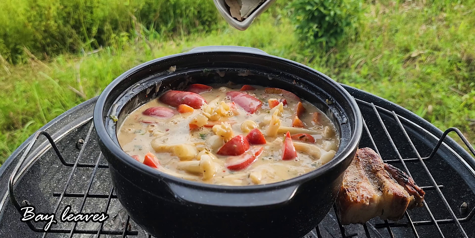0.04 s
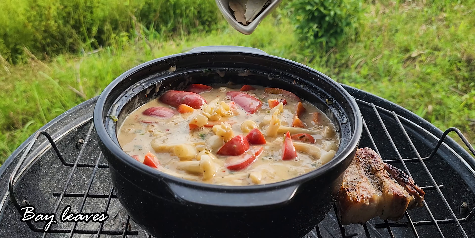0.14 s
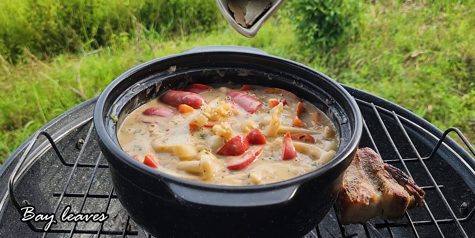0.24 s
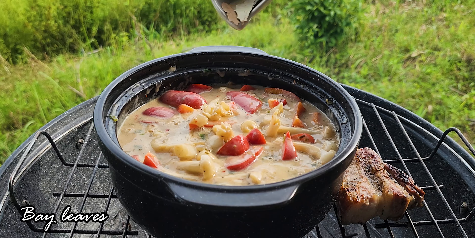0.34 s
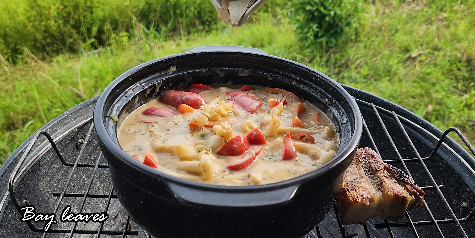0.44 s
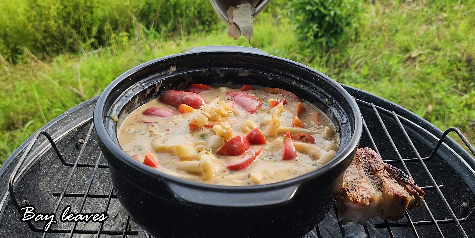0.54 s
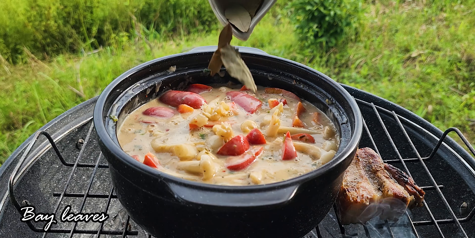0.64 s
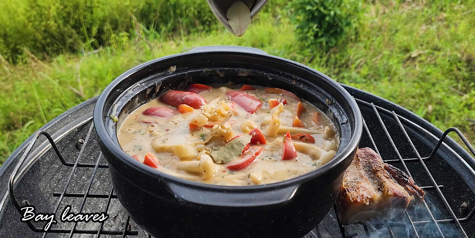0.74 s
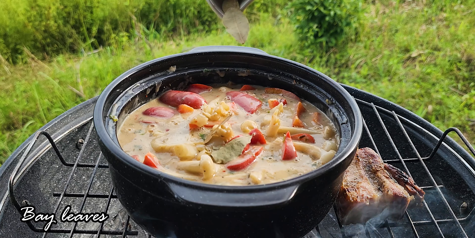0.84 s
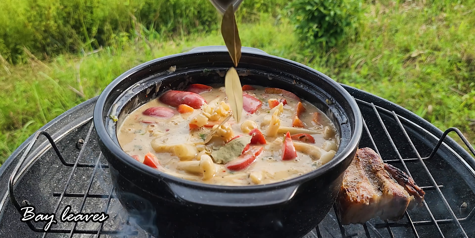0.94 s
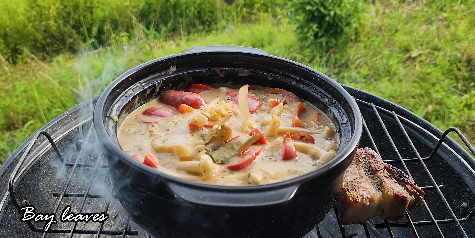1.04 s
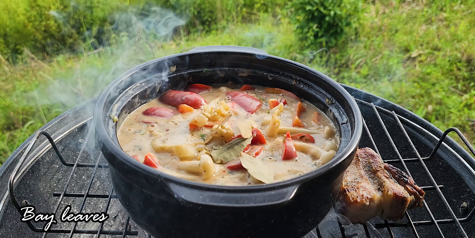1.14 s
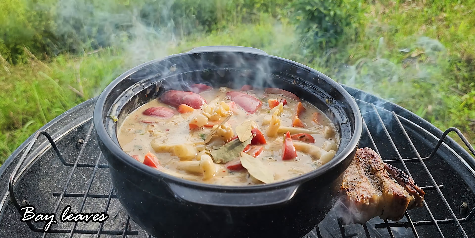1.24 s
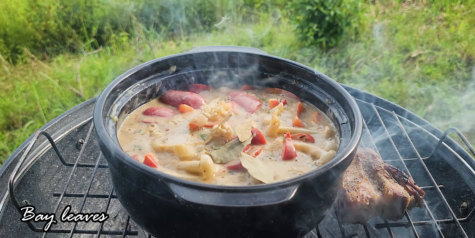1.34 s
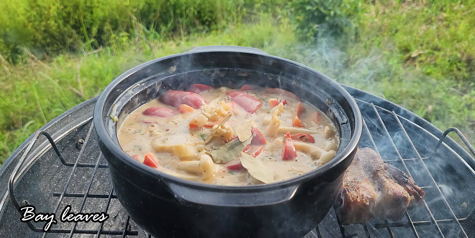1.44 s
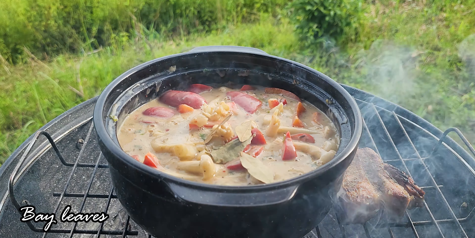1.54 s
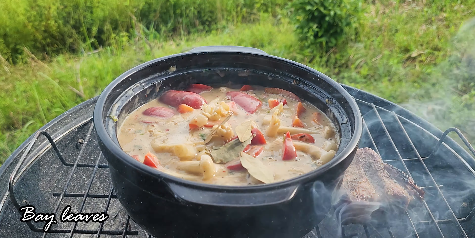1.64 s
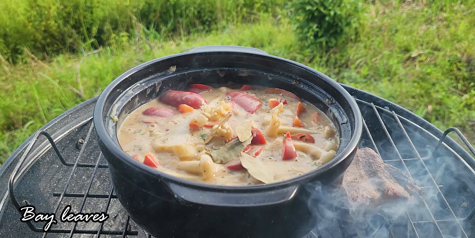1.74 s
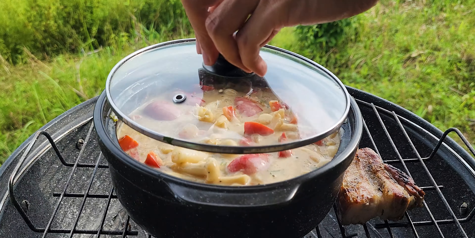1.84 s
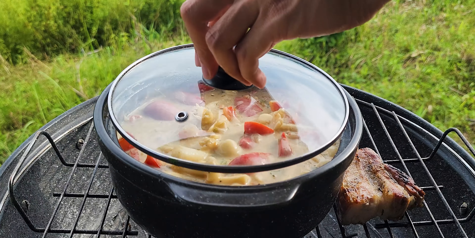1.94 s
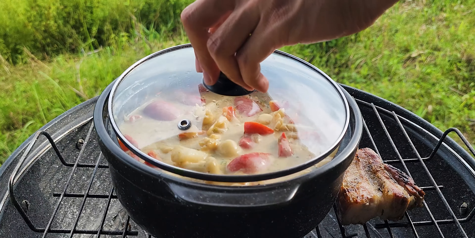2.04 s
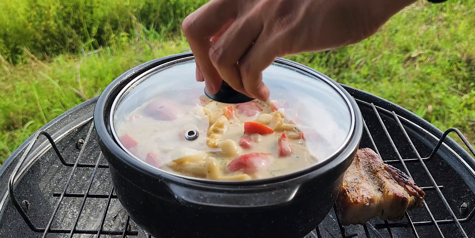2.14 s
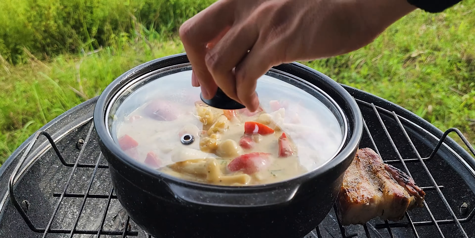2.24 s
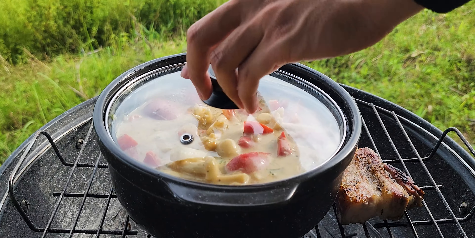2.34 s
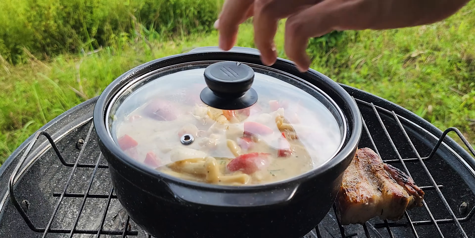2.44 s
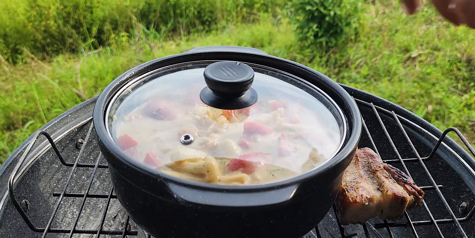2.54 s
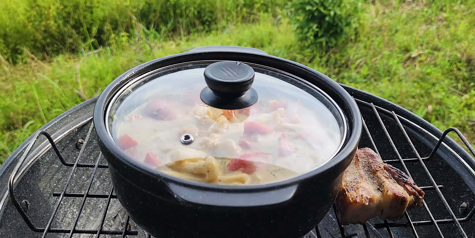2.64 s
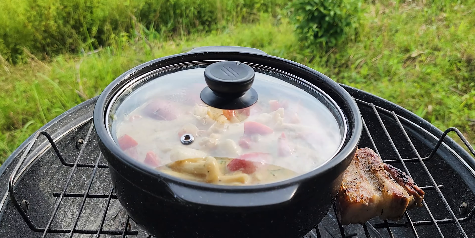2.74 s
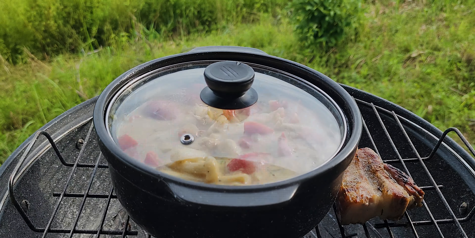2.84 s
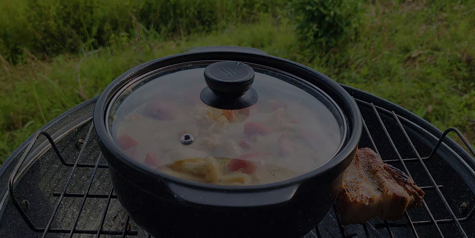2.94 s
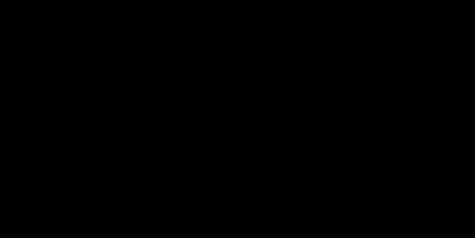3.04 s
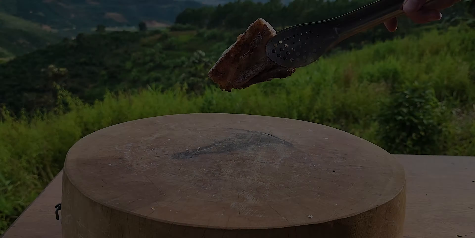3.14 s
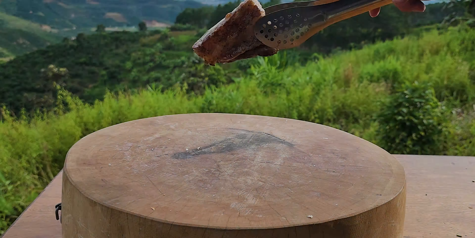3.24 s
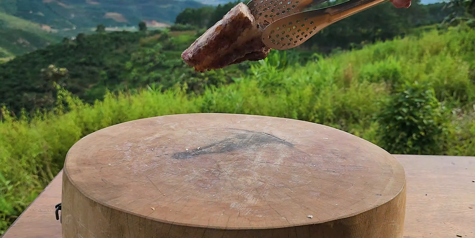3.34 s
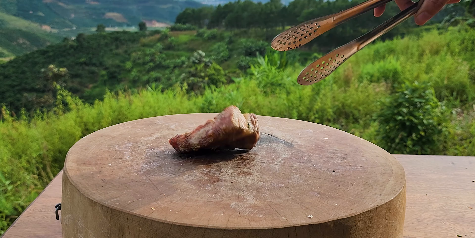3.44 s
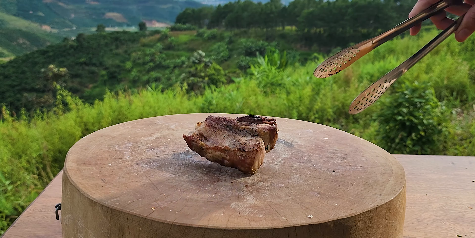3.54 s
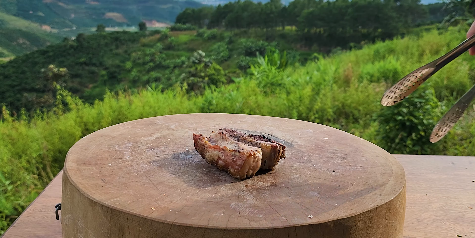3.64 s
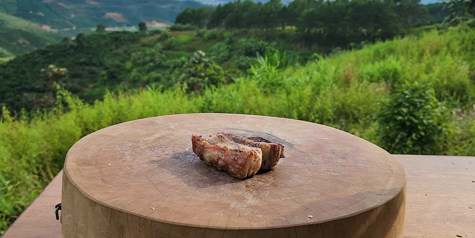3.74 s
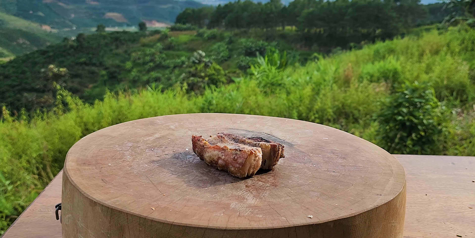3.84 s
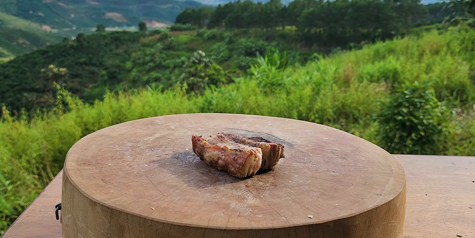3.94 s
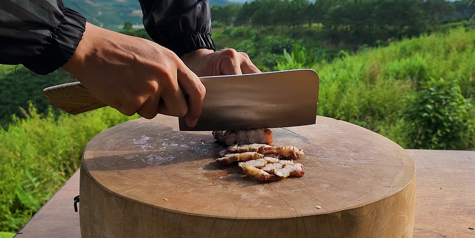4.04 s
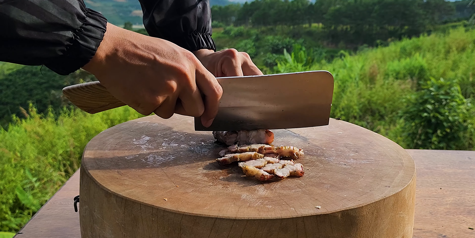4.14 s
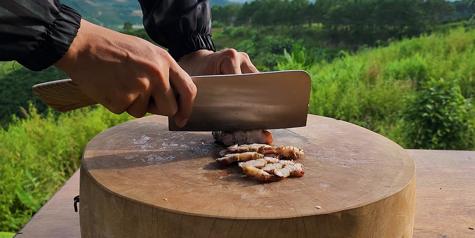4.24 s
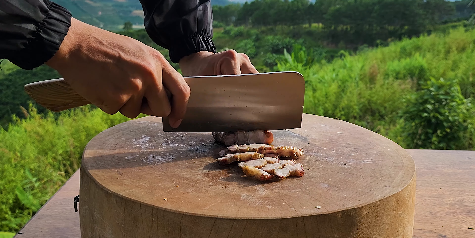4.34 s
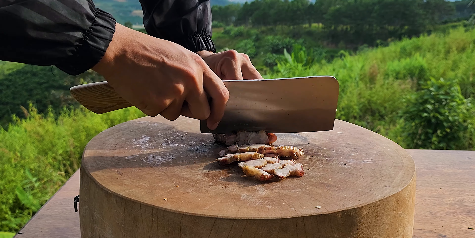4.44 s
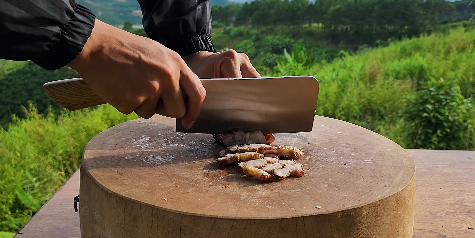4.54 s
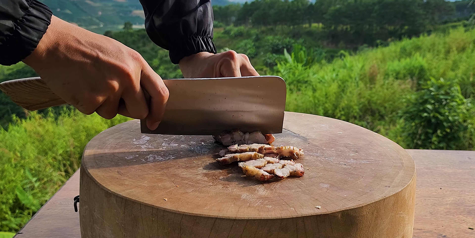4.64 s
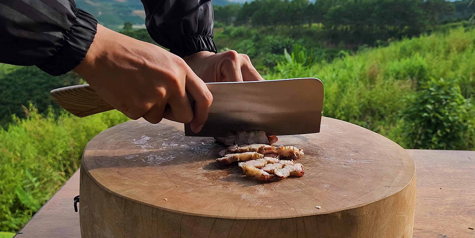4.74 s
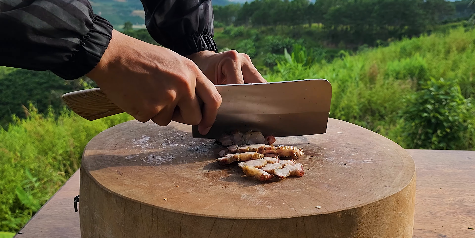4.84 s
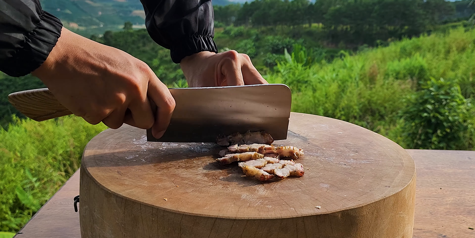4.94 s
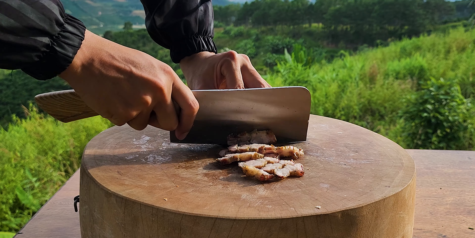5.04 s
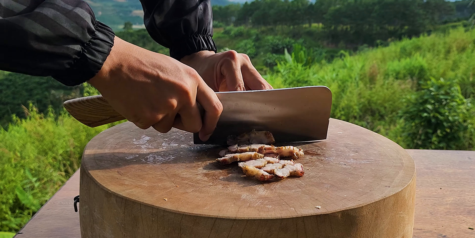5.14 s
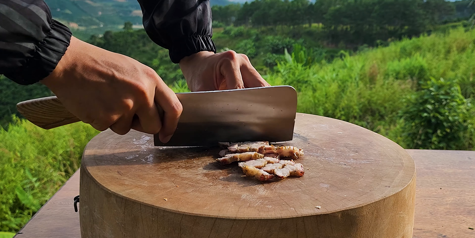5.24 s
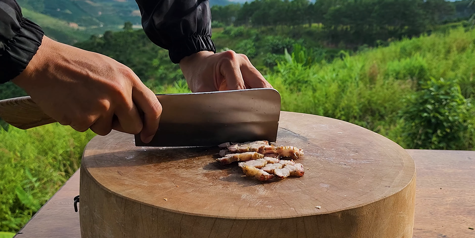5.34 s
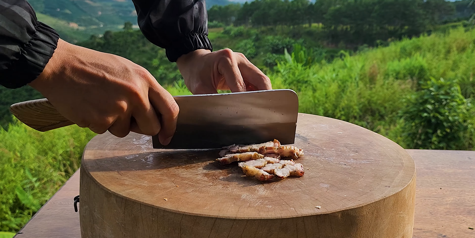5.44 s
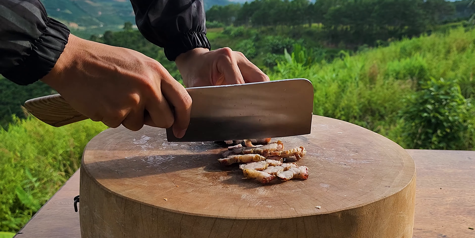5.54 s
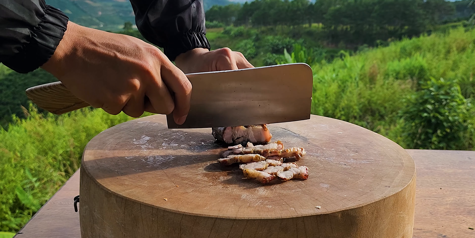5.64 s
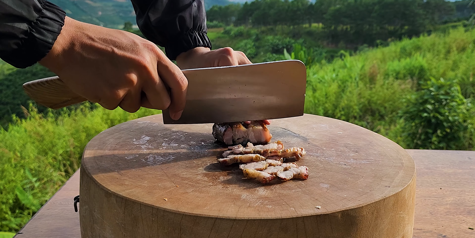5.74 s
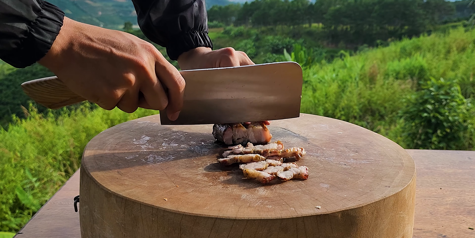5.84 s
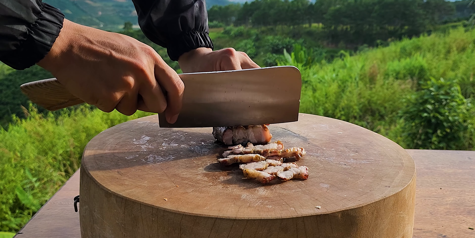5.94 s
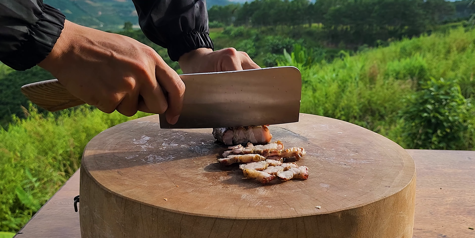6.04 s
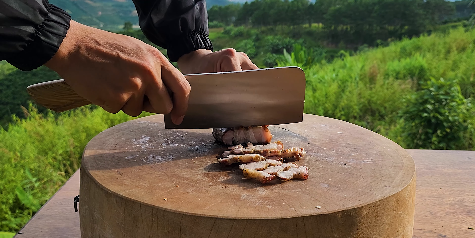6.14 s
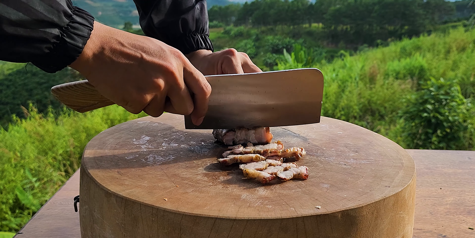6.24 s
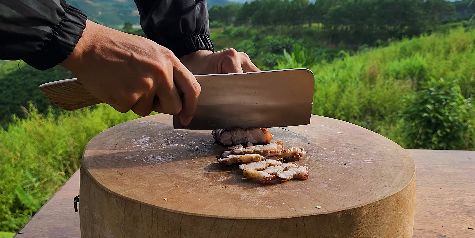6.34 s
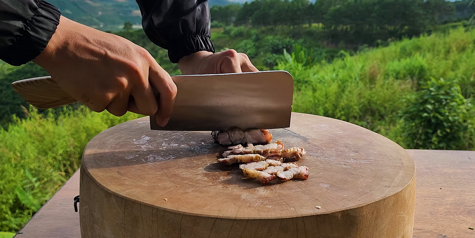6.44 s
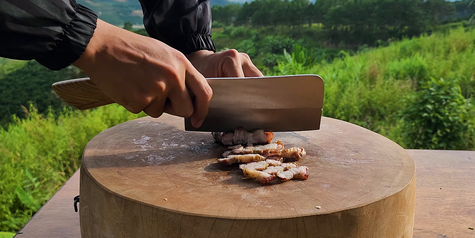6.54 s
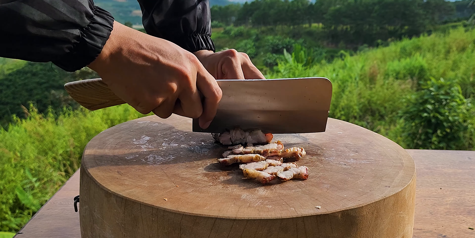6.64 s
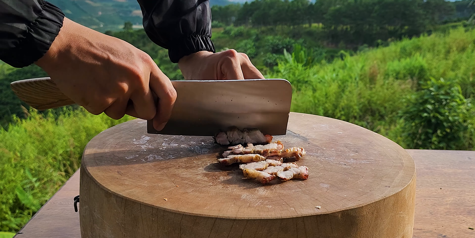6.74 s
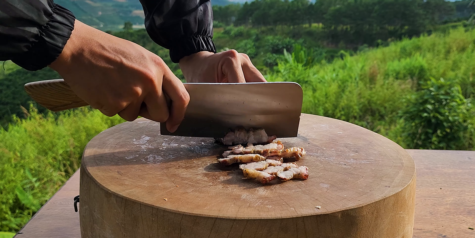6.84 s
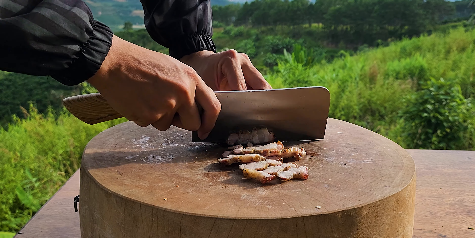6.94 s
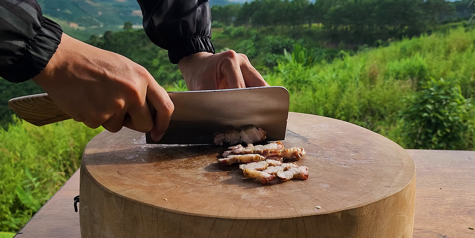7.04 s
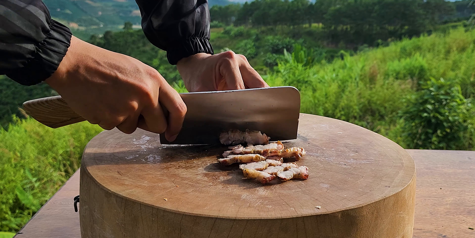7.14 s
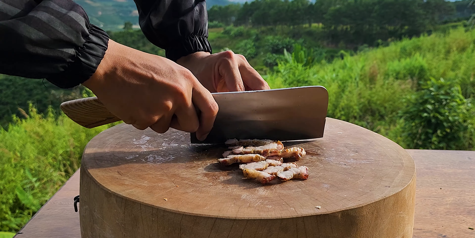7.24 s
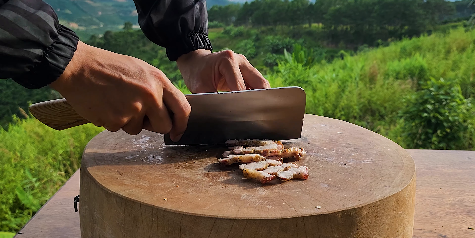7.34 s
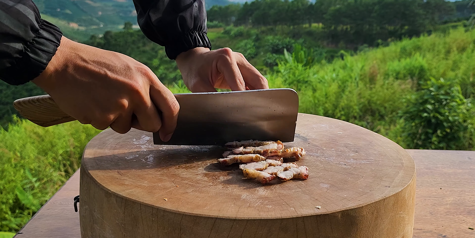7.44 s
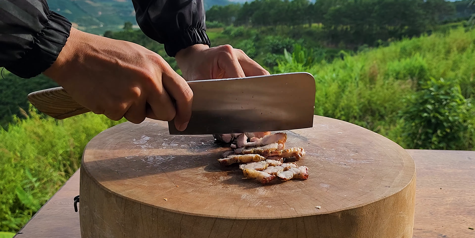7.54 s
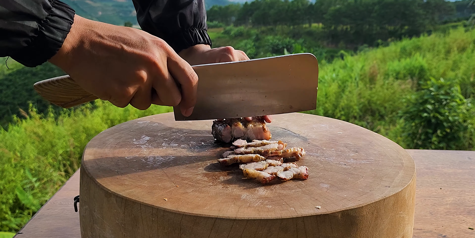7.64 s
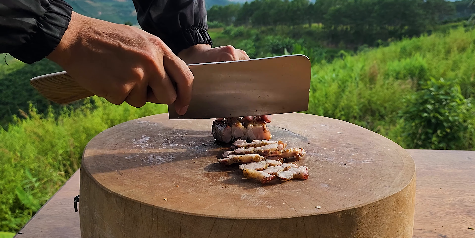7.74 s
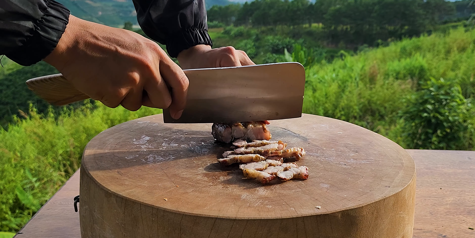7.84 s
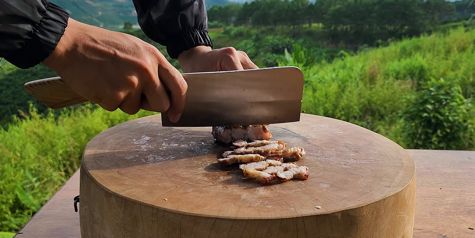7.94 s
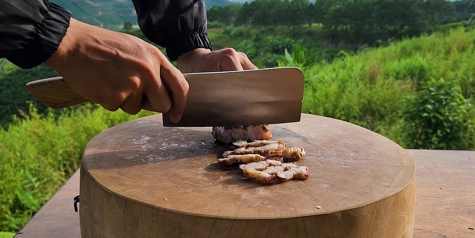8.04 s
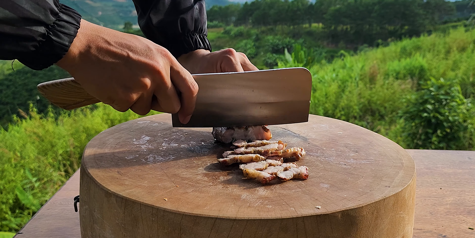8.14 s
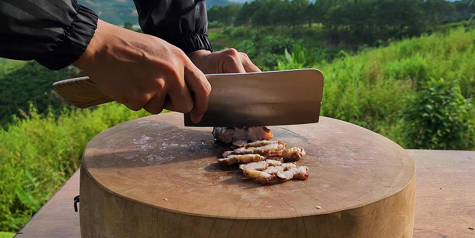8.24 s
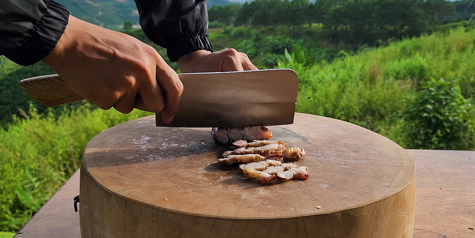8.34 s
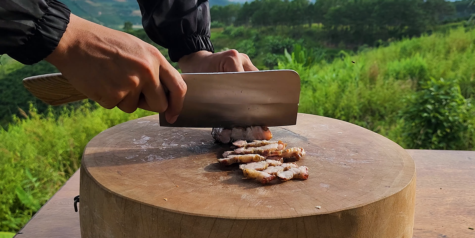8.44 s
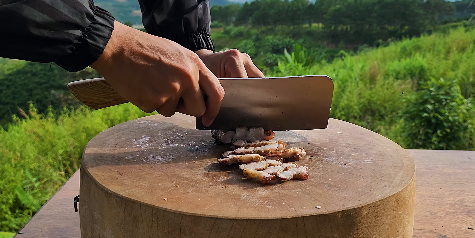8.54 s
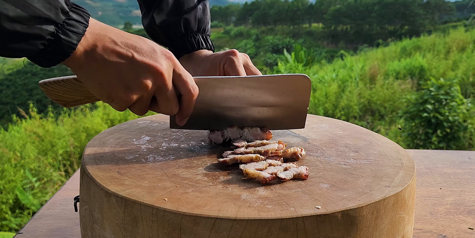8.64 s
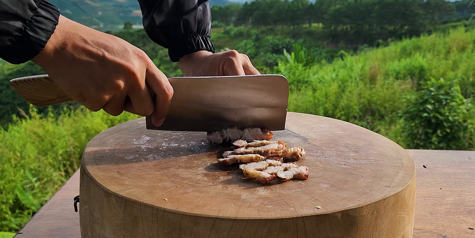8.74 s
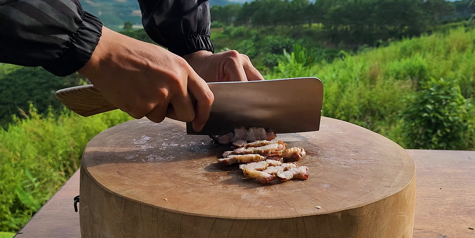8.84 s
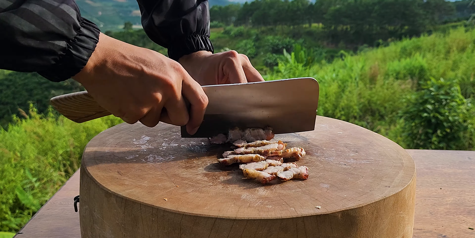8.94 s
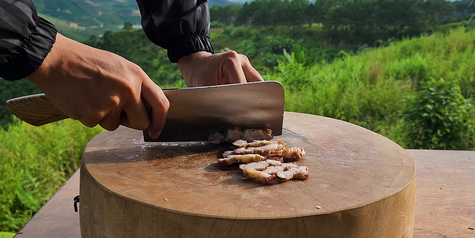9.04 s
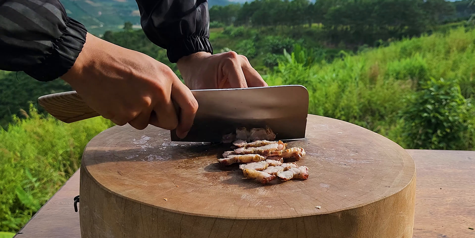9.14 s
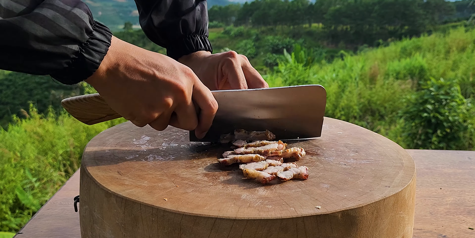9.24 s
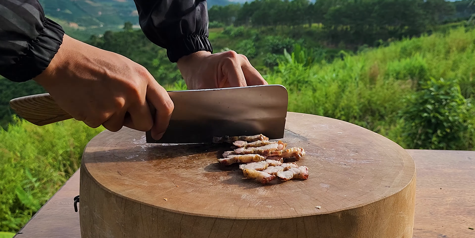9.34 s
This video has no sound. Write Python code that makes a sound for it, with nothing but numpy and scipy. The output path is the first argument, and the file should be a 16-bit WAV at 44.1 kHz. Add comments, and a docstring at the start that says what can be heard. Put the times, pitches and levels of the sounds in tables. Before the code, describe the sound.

Outdoors on a grassy hillside, close to a grill, food sizzles with small pops of fat. A glass lid lands on the pot with a loud, ringing clink. As the sizzling dies down, meat thuds onto a wooden block and a cleaver cuts it with quick sawing strokes and woody knocks. The sizzling returns, growing louder to the end. Insects shrill faintly, a bird repeats a falling whistle and soft gusts touch the microphone.

```python
"""Cooking on a hillside: a stew pot sizzles on a grill and a glass lid clinks down onto its rim.
Then meat drops on a thick wooden block and a cleaver saws through it and knocks the wood, until the sizzle swells again.
Birds whistle, insects shrill in the grass and the open air rumbles."""
import sys
import numpy as np
from scipy import signal
from scipy.fft import rfft, irfft, next_fast_len
from scipy.io import wavfile
from scipy.ndimage import uniform_filter1d

SR = 44100
rng = np.random.default_rng(int(sys.argv[2]) if len(sys.argv) > 2 else 0)


def generate_wav(signal):
    """Clip the signal to [-1, 1] and save it as 16-bit WAV at the path in sys.argv[1]."""
    frames = np.transpose(np.atleast_2d(signal))
    scaled = np.clip(frames, -1, 1) * 32767
    pcm = np.round(scaled).astype(np.int16)
    wavfile.write(sys.argv[1], SR, pcm)


N = 414099

# the sizzle swells, fades under the cutting and swells again: (s, sizzle dB)
HEAT = [(0, -60.5), (.4, -62), (1.1, -49.5), (1.7, -47), (2.25, -44.5), (2.95, -51.5), (3.6, -60), (3.8, -68), (4.3, -72.5), (7.3, -78), (7.65, -60.5), (8.1, -50.5), (8.5, -46.5), (9.05, -41.5), (9.39, -38.5)]
FRYING = [(120, -17.5), (200, -3), (316, -7.5), (547, -5.5), (719, -7), (863, -6), (1360, -8.5), (1550, -7), (2540, -5),
          (3590, -2), (4390, -1.5), (6220, -4.5), (6810, -5.5), (7740, -5), (15800, -23)]  # (Hz, dB per Hz)
# the loudest bursts of fat: (s, peak dB, pitch Hz)
SPITS = [(0.0662, -36, 7760), (0.4324, -36.5, 7300), (0.632, -30.5, 4830), (0.8712, -30.5, 5100), (1.2045, -27, 4450),
         (1.7903, -26.5, 3820), (1.8532, -22.5, 4610), (2.8324, -29.5, 4180), (2.8704, -35, 7200), (2.9782, -24.5, 4840),
         (3.1734, -33.5, 4200), (7.7806, -34, 3710), (8.4411, -24, 3070), (8.652, -28, 6050), (8.7515, -23, 4280),
         (9.028, -22.5, 5050), (9.0513, -18.5, 3660), (9.2833, -33, 6860)]
# lid on rim: (s, ring dB, clink dB)
LID = [(1.8891, -14.5, -9.5), (1.8913, -23, -12), (1.918, -14, -2.5), (1.932, -31, -13.5), (1.937, -26, -23.5), (1.963, -29, -26.5), (2.04, -35.5, -41), (2.1146, -51, -23)]
# lid and pot ringing together: (Hz, dB, t60 s)
POT = [(470, -15, .07), (517, -14, .1), (556, -5, .11), (615, 0, .12), (692, -16, .38), (726, -15, .1), (766, -12, .1), (1048, -14, .08), (1355, -13, .08), (1670, -11, .075), (2630, -19, .08), (3142, -4, .09), (3215, -10, .09)]  # fixed
RIM = [(1075, 89, -12), (1260, 180, -1), (1648, 23, -10.5), (2540, 71, -33), (3210, 196, 4.5), (4160, 110, -27),
       (4440, 300, -11), (5130, 180, -1.5), (5640, 74, -30), (5730, 110, -23), (6400, 240, 1), (7700, 78, -36),
       (8070, 130, -7), (9830, 110, -35), (10100, 160, -17), (11700, 66, -30), (13800, 150, -28)]  # the steel-edged lid: (Hz, width Hz, dB)
# dull knocks as the lid settles: (s, dB, t60 s)
SETTLE = [(2.203, -30.5, 0.1), (2.251, -30.5, 0.063), (2.262, -39.5, 0.31)]
SEAT = [(100, -6), (280, -9.5), (400, -3.5), (700, -7), (1400, -18.5), (2200, -14), (6000, -37.5)]  # (Hz, dB)
# meat or blade comes down on the block: (s, lead of the first wet touch s, thud dB, knock dB, wet smack dB)
BLOWS = [(3.499, 0.025, -31.5, -38, -36), (5.040, .006, -31, -22.5, -32), (6.886, .0155, -31, -22, -32), (7.424, .005, -37, -40.5, -40), (9.155, .033, -32, -27, -24.5)]
THUD = [(40, -1.5), (75, -16.5), (112, 14), (150, -10.5), (200, 3.5), (250, -18), (320, -11.5), (450, -25), (900, -34)]  # (Hz, dB)
KNOCK = [(180, -49), (300, 14), (364, -21), (463, 3), (618, -8.5), (809, -4.5), (1080, 1.5), (1200, -5), (1310, -2),
         (2020, -22.5), (2230, -12), (2500, -26), (3000, -62), (3900, -61), (6600, -120)]  # (Hz, dB per Hz)
FIBRES = [(400, -8), (1400, -6.5), (4500, -3), (6500, -1), (9000, -4.5), (12000, -11), (15800, -7)]  # (Hz, dB)
BLADE = [(810, 62, -1), (1215, 120, -18), (1380, 42, 7.5), (1627, 58, 3), (2010, 170, 1.5), (3364, 49, 5.5), (3950, 190, 2.5), (4910, 60, 4.5), (5530, 100, -4), (8370, 330, 1)]  # (Hz, width Hz, dB)
# the blade's edge catches and rings: (s, dB)
TINGS = [(5.385, -38.5), (6.69, -47), (7.4243, -29.5)]
# the cleaver's free modes: (Hz, dB, t60 s)
STEEL = [(650, -10, .07), (1367, -6, .11), (3222, -2, .17), (3838, -18, .2), (5265, -14, .11), (7880, -1, .1), (8050, -6, .07), (8800, -7, .06), (9650, -13, .06)]  # fixed
# a bird's long falling whistle: (s, dB, left-right dB)
WHISTLES = [(4.775, -61, -7), (5.335, -56.5, -7), (5.938, -55.5, -7), (6.529, -55, -6), (7.093, -53.5, -6)]
# its shape: (s from start, Hz, dB)
FALL = [(0, 3483, -10), (.018, 2780, -1), (.04, 2420, 2), (.08, 2130, 3), (.135, 2092, -10.5), (.17, 1970, 3), (.225, 1830, -14), (.27, 1738, -6), (.36, 1495, -14), (.42, 1440, -39)]
# a second bird's level pipe: (s, Hz, dB)
PIPES = [(3.995, 3520, -70), (4.077, 3450, -65), (5.913, 3275, -59), (7.984, 3500, -57.5)]
PIPE = [(0, .8, -4), (0.033, .91, 4), (0.064, 0.98, 8), (.12, 0.98, 9.5), (.15, .99, -48), (.2, 0.88, -28)]  # (s from start, share of pitch, dB)
# small birds' runs of downward chips: (first s, last s, spacing s, first Hz, last Hz, dB)
CHIPS = [(3.75, 4.017, .033, 9300, 8450, -61.5), (6.424, 6.614, .037, 5060, 5050, -60.5)]
SHRILL = [(5800, -46), (6500, -14), (6750, -20), (6950, 1), (7400, -4), (7600, 6), (7780, -13), (8200, -31)]  # insect chorus: (Hz, dB)
RUMBLE = [(12, -33), (20, 5), (38, -5.5), (81, -3), (118, -8), (135, -14), (195, -20), (242, -25), (269, -24),
          (500, -33), (650, -40), (1100, -120)]  # (Hz, dB per Hz)
HUSH = [(150, -5.5), (400, -2.5), (800, -6), (1500, -12.5), (3000, -16), (6000, -22), (9000, -20.5), (12500, -11), (14300, -5.5), (15500, -8.5)]  # steady faint hiss: (Hz, dB)
TOP_HZ = 15900  # fixed
# nearer crickets: (Hz, chirps a second, dB)
CRICKETS = [(7590, 11.5, -59), (7300, 13, -62), (7080, 9, -65), (6620, 8, -71)]  # fixed
# the block and the table under it: (Hz, dB, t60 s)
TABLE = [(203, 0, .16), (255, -7, .1), (325, -6, .08), (560, -9, .05), (1090, -3, .1), (1240, -7, .07)]  # fixed
# lesser bursts come at random: how many a second, their peak over the sizzle, their usual pitch
SPITS_PER_S, SPIT_OVER_DB, SPIT_HZ = 6, 13.5, 4300
# every blow bounces once: delay and loss; the meat is squeezed again as the blow lands
REBOUND_S, REBOUND_DB, SQUEEZE_DB = .0115, -5, -4.5
# light wet touches and cracks of the crust: (s, dB)
SMACKS = [(3.589, -39.5), (3.648, -45), (3.971, -45.5), (4.7, -40.5), (4.764, -33.5), (4.999, -37), (5.015, -34)]
# sawing off one slice: (middle of the first stroke s, tearing dB, its growth dB per stroke, blade rub dB)
SLICES = [(4.22, -53.5, 0.72, -57.5), (6.201, -56, 1.5, -60)]
# the cleaver goes to and fro evenly: time from stroke to stroke, length of one, extra rub once the edge is on the wood
STROKE_EVERY_S, STROKE_LENGTH_S, ON_WOOD_DB = 0.16674, 0.17, 11.5
# a run starts softly and grows by this much
CHIP_SWELL_DB = 9
# rumble of the air between gusts
AIR_DB = -48
# soft gusts: (middle s, half-length s, dB, left-right dB)
GUSTS = [(1.13, 0.057, -44, 4), (1.5, .4, -48, 4), (2.13, 0.078, -42, 2), (3.46, 0.28, -44.5, -1), (5.987, 0.4, -45, -5.5)]
# share by which the blade's resonances slide as the contact travels along the edge
BLADE_SLIDE = .035
# a bush cricket's very high rasp on the left: (s, dB)
RASP = [(3.1, -63), (4.3, -59), (9.39, -57.5)]
# its colour: (Hz, dB)
RASP_COLOUR = [(11000, -35), (13000, -18), (14000, -3.5), (15700, -8)]
# its wing strokes
RASP_HZ = 18.2
# gusts push on the microphone with a deeper rumble: (Hz, dB per Hz)
BUFFET = [(12, -22), (25, 2.5), (50, 0.5), (90, -7), (150, -23), (400, -50), (900, -120)]


def amp(db):
    """Decibels to gain."""
    return np.exp(np.asarray(db) * np.log(10) / 20)


def unit(x):
    """x at rms 1."""
    return x / np.sqrt(np.mean(x ** 2) + 1e-20)


def along(points, hz):
    """(Hz, value) points on a log axis."""
    f, v = np.transpose(points)
    return np.interp(np.log(hz + 1), np.log(f + 1), v)


def curve(rows):
    """(s, value) rows as one value per sample."""
    return np.interp(np.arange(N) / SR, *np.transpose(rows))


def wobble(rate):
    """A random curve through rate knots a second."""
    knots = rng.standard_normal(N // 40)
    return np.interp(np.arange(N) * rate / SR, np.arange(len(knots)), knots)


def filtered(x, response):
    """x times a complex response of frequency."""
    n = x.shape[-1]
    m = next_fast_len(n + 1024, real=True)
    return irfft(rfft(x.astype(np.float32), m) * response(np.fft.rfftfreq(m, 1 / SR)).astype(np.complex64), m)[..., :n]


def coloured(x, spectrum):
    """x with a (Hz, dB) colour, at rms 1."""
    return unit(filtered(x, lambda hz: amp(along(spectrum, hz))))


def pair(n, apart):
    """Stereo white noise; apart is the size of side against mid."""
    mid, side = rng.standard_normal((2, n))
    return unit(np.array([mid + apart * side, mid - apart * side]))


def placed(x, lead_ms, pan_db):
    """A source off centre reaches the left microphone earlier and louder."""
    sides = np.array([[.5], [-.5]])
    return amp(pan_db * sides) * filtered(x, lambda hz: np.exp(2j * np.pi * hz * sides * lead_ms / 10 ** 3))


def add(track, s, sound):
    """Mix a sound into the track at s seconds."""
    room = track[..., max(round(s * SR), 0):][..., :sound.shape[-1]]
    room += sound[..., :room.shape[-1]]


def burst(spectrum, t60, attack, apart, size=8000):
    """A dense cluster of vibrations that rises fast and dies away."""
    t = np.arange(size) / SR
    return coloured(pair(size, apart), spectrum) * amp(-60 * t / t60) * (1 - np.exp(-t / attack))


def ring(modes, spread, attack, size=10000):
    """Struck modes swell and fade; each radiates a little differently to the two sides."""
    t = np.arange(size) / SR
    sides = np.array([[1], [-1]])
    return sum((-1) ** k * amp(db + rng.normal() - 60 * t / t60) * np.cos(2 * np.pi * hz * t + spread * sides * rng.normal())
               for k, (hz, db, t60) in enumerate(modes)) * (1 - np.exp(-t / attack))


def outdoors(x, wet_db, t60):
    """Ground and bushes scatter a thin tail."""
    t = np.arange(SR // 2) / SR
    tail = rng.standard_normal((2, len(t))) * amp(-60 * t / t60) * (1 - np.exp(-t / 0.00607))
    return x + amp(wet_db) * signal.fftconvolve(x, tail / np.linalg.norm(tail[0]), axes=1)[:, :N]


def sizzle(rate=1500, size_db=4.5, grain_db=-3.5, fizz_db=-2.5, level_db=3.5):
    """Countless tiny steam bubbles burst; the larger ones stand out as crackle."""
    count = int(rate * N / SR)
    when, size, pitch, life = rng.random((count, 4)).T
    t = np.arange(96) / SR
    hz = 1300 * 9 ** pitch[:, None]
    strength = amp(size_db * np.minimum(-np.log(1 - size), 4))[:, None]  # fixed
    pops = strength * np.cos(2 * np.pi * hz * t) * np.exp(-t * hz / (.2 + life[:, None]))  # fixed
    grains = np.bincount(((when * N).astype(int)[:, None] + np.arange(len(t))).ravel(), pops.ravel())[:N]
    grains = coloured(grains, [(200, -0.5), (2000, -7.0), (6000, 1.0), (15000, 7.0)]) * amp(6.5 * wobble(110))  # bubbles burst in clusters
    mid = amp(grain_db) * coloured(grains, FRYING) + amp(fizz_db + wobble(35)) * coloured(rng.standard_normal(N), FRYING)
    side = amp(-46) * coloured(rng.standard_normal(N), FRYING)
    surge_db = 1.4 * wobble(18)  # fixed
    return amp(curve(HEAT) + level_db + surge_db) * np.array([mid + side, mid - side])


def spits(level_db=-4, t60=0.018, scatter_db=3, scatter_octaves=0.37):
    """Single bursts of hot fat, each with its own pitch; the lesser ones follow the heat."""
    out = np.zeros((2, N))
    lesser = []
    for s in rng.uniform(0, N / SR, int(SPITS_PER_S * N / SR)):
        db = np.interp(s, *np.transpose(HEAT)) + SPIT_OVER_DB + scatter_db * rng.normal()
        lesser.append((s, db, SPIT_HZ * 2 ** (scatter_octaves * rng.normal())))
    for s, db, hz in list(SPITS) + lesser:
        colour = [(300, -20), (hz / 3, -12), (hz / 1.7, -8), (hz, 0), (hz * 1.5, -10), (15000, -23)]
        add(out, s, amp(db + level_db) * burst(colour, t60, attack=0.00016, apart=0.033, size=1000))
    return out


def lid(pot_db=-2, rim_db=-9, crack_db=-6):
    """The lid lands on one edge, then the other, chatters and settles into its seat."""
    pot, edge = np.zeros((2, 2, N))
    rim = [(hz, db, 1.9 / width) for hz, width, db in RIM]  # a wider resonance dies sooner
    for s, ring_db, clink_db in LID:
        crack = burst([(300, -12.5), (600, 4), (1500, 2), (3200, 7.5), (5200, 0.0), (6500, -8), (8000, -12.5), (15000, -22.5)], t60=0.029, attack=.0001, apart=0.35, size=1500)
        add(pot, s, amp(ring_db + pot_db) * ring(POT, spread=0.11, attack=0.00033))
        add(edge, s, amp(clink_db + rim_db) * ring(rim, spread=0.8, attack=0.00013, size=2500))
        add(edge, s, amp(clink_db + crack_db) * crack)
    for s, db, t60 in SETTLE:
        add(pot, s, amp(db) * burst(SEAT, t60, attack=0.00059, apart=.2))
    return outdoors(placed(pot, lead_ms=0.1, pan_db=1.5) + placed(edge, lead_ms=0.17, pan_db=-0.5), wet_db=-22, t60=0.87)


def block(table_db=-4, touch_thud_db=-4):
    """A blow is a wet smack, then a woody knock and a thud that bounce once and ring the table below."""
    out = np.zeros((2, N))
    touches = list(SMACKS)
    for s, lead, thud_db, knock_db, smack_db in BLOWS:
        touches += [(s - lead, smack_db), (s, smack_db + SQUEEZE_DB)]
        for when, loss_db in [(s, 0), (s + REBOUND_S, REBOUND_DB)]:
            add(out, when, amp(thud_db + loss_db - 5.0) * burst(THUD, t60=0.25, attack=0.0041, apart=0.051))
            add(out, when, amp(knock_db + loss_db + table_db) * ring(TABLE, spread=.03, attack=0.0083))
            add(out, when, amp(knock_db + loss_db) * burst(KNOCK, t60=0.051, attack=0.0017, apart=0.11))
    for s, db in touches:
        add(out, s, amp(db) * burst([(600, 3.5), (1800, 2.5), (4200, 3.5), (6500, 3.5), (9000, 0.5), (15000, -1)], t60=0.056, attack=.0002, apart=0.92, size=2000))
        add(out, s, amp(db + touch_thud_db) * burst(THUD, t60=0.18, attack=0.0045, apart=0.037))
    return outdoors(placed(out, lead_ms=0.11, pan_db=0.5), wet_db=-11.5, t60=0.76)


def cleaver(grain_db=3.5, wood_db=-5):
    """Sawing tears fibres, rubs the blade into its sliding resonances and shakes the block; now and then the edge rings."""
    tear, rub = strokes()
    tings = np.zeros((2, N))
    clumps = 1.6 * wobble(70)  # fixed
    slips = amp(grain_db * wobble(500) + clumps)  # the crust gives way in tiny slips
    blade = lambda f: sum((-1) ** k * amp(db) * 1j * f * w / (c * c - f * f + 1j * f * w) for k, (c, w, db) in enumerate(BLADE))
    travel = np.cumsum(1 + BLADE_SLIDE * np.sin(np.pi * (np.arange(N) / SR - SLICES[0][0]) / STROKE_EVERY_S))
    scrape = np.array([np.interp(travel, np.arange(N), side) for side in filtered(slips * pair(N, apart=0.48), blade)])
    for s, db in TINGS:
        add(tings, s, amp(db) * ring(STEEL, spread=0.79, attack=0.00093))
    sawing = tear * coloured(slips * pair(N, apart=0.72), FIBRES) + rub * unit(scrape)
    wood = amp(wood_db) * rub * coloured(pair(N, apart=0.05), [(100, -4), (220, 3), (320, -4), (600, -19), (1200, -21.5)])
    return placed(sawing + tings + wood, lead_ms=0.093, pan_db=1.0)


def note(shape, waver):
    """A whistled glide through (s, Hz, dB) points with a slightly unsteady pitch."""
    s, hz, db = np.transpose(shape)
    t = np.arange(int(s[-1] * SR)) / SR
    pitch = uniform_filter1d(np.interp(t, s, hz), size=300) * (1 + waver * unit(uniform_filter1d(rng.standard_normal(len(t)), size=200)))
    return np.sqrt(2) * amp(np.interp(t, s, db)) * np.sin(2 * np.pi * np.cumsum(pitch) / SR)


def birds():
    """One bird repeats a falling whistle to the right; others pipe and chip farther off."""
    near, far, small = np.zeros((2, N)), np.zeros(N), np.zeros(N)
    for s, db, pan_db in WHISTLES:
        add(near, s, amp(db) * placed(note(FALL, waver=0.0085), lead_ms=0.025, pan_db=pan_db))
    for s, hz, db in PIPES:
        add(far, s, amp(db) * note([(t, share * hz, level) for t, share, level in PIPE], waver=.012))  # fixed
    for first, last, spacing, first_hz, last_hz, run_db in CHIPS:
        for part in np.linspace(0, 1, round((last - first) / spacing) + 1):
            s, db = first + part * (last - first), run_db - CHIP_SWELL_DB * (1 - part) ** 2
            hz = first_hz + (last_hz - first_hz) * part ** 3
            add(small, s, amp(db) * note([(0, hz + 250, -18.5), (.008, hz, 1), (.024, hz - 480, 2.5), (.036, hz - 900, -22)], waver=.012))
    return (outdoors(near, wet_db=-6.5, t60=0.53)
            + outdoors(placed(far, lead_ms=0.098, pan_db=-0.5), wet_db=-3, t60=0.98)
            + outdoors(placed(small, lead_ms=-0.033, pan_db=5), wet_db=-2.5, t60=.25))


def insects(chorus_db=-58):
    """A blurred chorus, with nearer crickets whose pitch sags as each chirp ends."""
    chorus = amp(chorus_db + 1.6 * wobble(14)) * coloured(pair(N, apart=0.68), SHRILL)
    near = 0
    for hz, rate, db in CRICKETS:
        cycle = np.cumsum(rate * (1 + 0.173 * wobble(5))) / SR % 1
        pitch = hz * (1 - 0.025 * cycle ** 3 + 0.0053 * wobble(300))
        near = near + amp(db) * unit(np.sin(np.pi * cycle) * amp(2.4 * wobble(6.9)) * np.sin(2 * np.pi * np.cumsum(pitch) / SR))
    return chorus + placed(near, lead_ms=0.048, pan_db=-2.5)


def air(hush_db=-60):
    """Low rumble of the open air and soft gusts on the microphone, under a faint even hiss."""
    t = np.arange(N) / SR
    sides = np.array([[.5], [-.5]])
    gusts = sum(amp(db + pan_db * sides) * np.exp(-np.minimum(((t - s) / half) ** 2, 20)) for s, half, db, pan_db in GUSTS)
    buffet = gusts * coloured(pair(N, apart=0.3), BUFFET)
    rumble = amp(AIR_DB + 0.9 * wobble(10)) * coloured(pair(N, apart=0.14), RUMBLE)
    return rumble + buffet + amp(hush_db) * coloured(pair(N, apart=0.69), HUSH)


def strokes(count=8):
    """Strength of tearing and rubbing: each stroke presses harder, and the last two of a slice run on the wood."""
    tear, rub = np.zeros((2, N))
    speed = np.abs(np.sin(np.linspace(0, np.pi, int(STROKE_LENGTH_S * SR)))) ** 1.48
    for first, tear_db, growth_db, rub_db in SLICES:
        for k in range(count):
            start = first + k * STROKE_EVERY_S - STROKE_LENGTH_S / 2
            add(tear, start, amp(tear_db + k * growth_db) * speed)
            add(rub, start, amp(rub_db + ON_WOOD_DB * (k >= count - 2)) * speed)
    return tear, rub


def bush_cricket(pulse_db=2.5, pan_db=7):
    """A thin rasp at the top of hearing that pulses with the wing strokes."""
    wings = np.sin(2 * np.pi * np.cumsum(RASP_HZ * (1 + .05 * wobble(4))) / SR)
    rasp = amp(curve(RASP) + pulse_db * wings) * coloured(pair(N, apart=1.0), RASP_COLOUR)
    return rasp * amp(pan_db * np.array([[.5], [-.5]]))


def scene():
    """Grill, chopping block and hillside together."""
    return sizzle() + spits() + lid() + block() + cleaver() + birds() + insects() + bush_cricket() + air()


def record(dry):
    """The recorder rounds off the highest peaks and keeps nothing above its band limit."""
    held = dry / (1 + np.abs(dry / .9) ** 6) ** (1 / 6)  # fixed
    return filtered(held, lambda hz: hz < TOP_HZ)


dry = scene()
out = record(dry)
generate_wav(out)
```